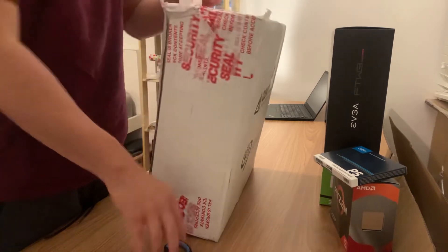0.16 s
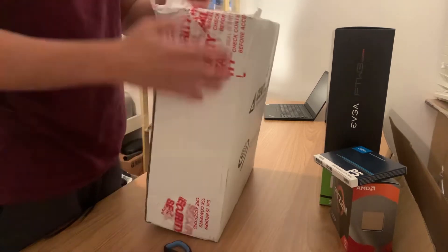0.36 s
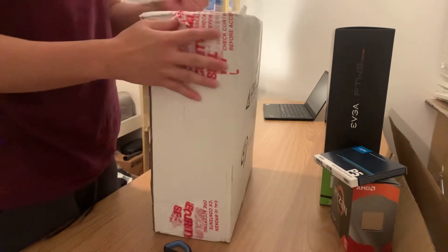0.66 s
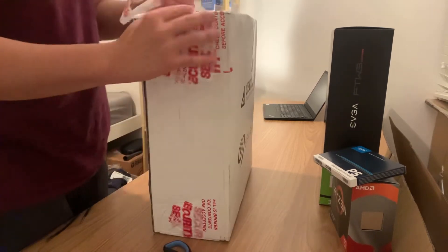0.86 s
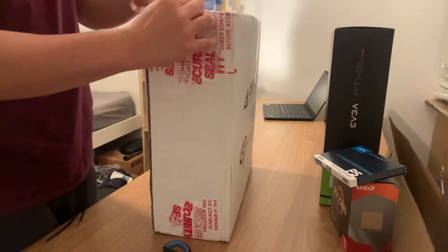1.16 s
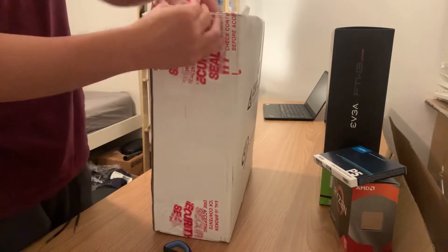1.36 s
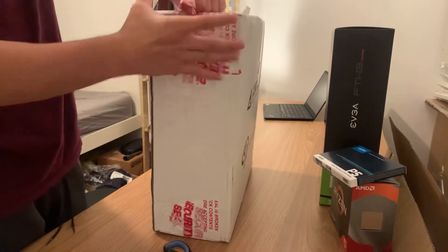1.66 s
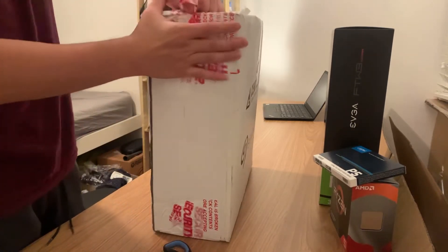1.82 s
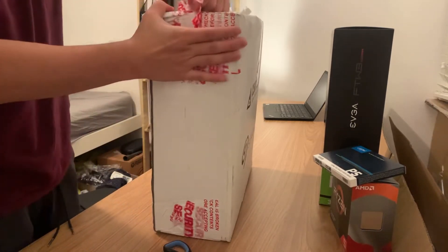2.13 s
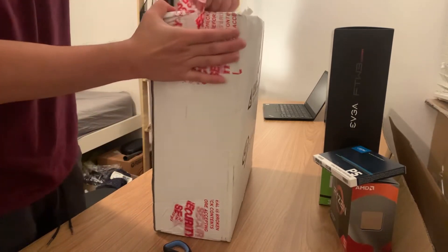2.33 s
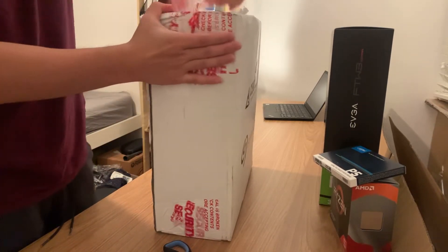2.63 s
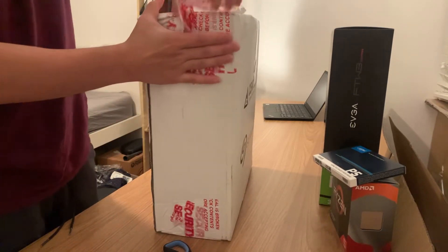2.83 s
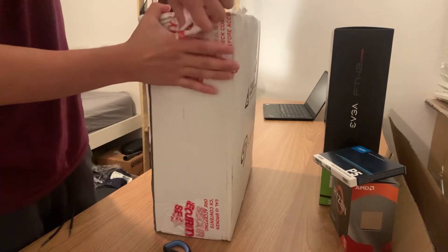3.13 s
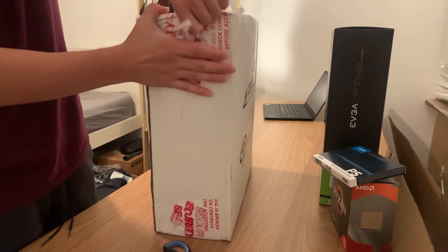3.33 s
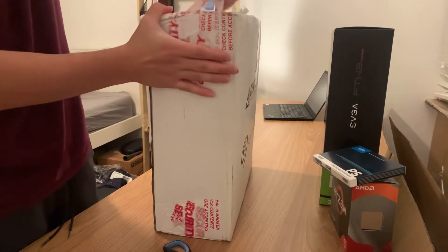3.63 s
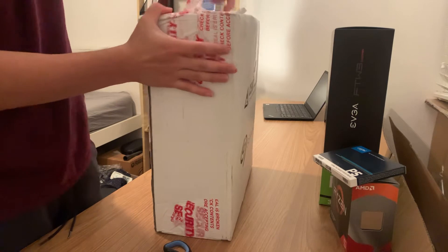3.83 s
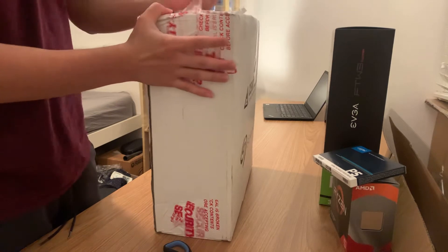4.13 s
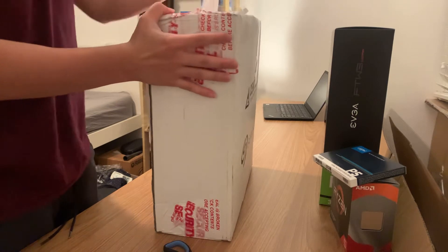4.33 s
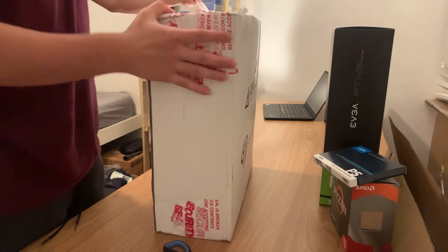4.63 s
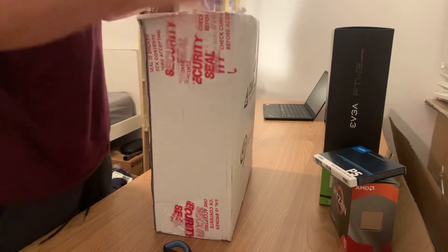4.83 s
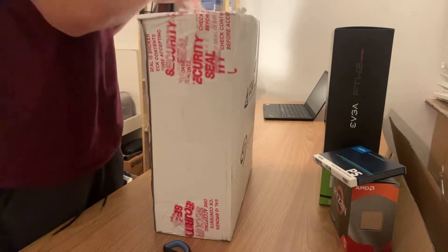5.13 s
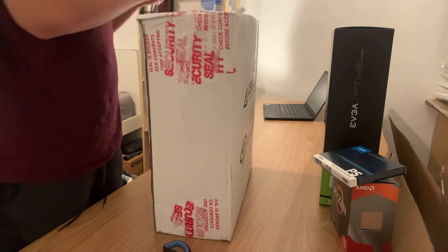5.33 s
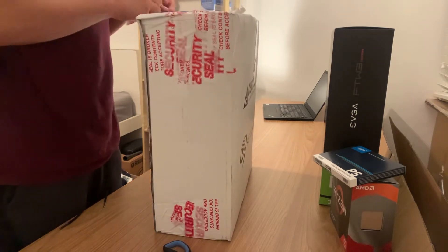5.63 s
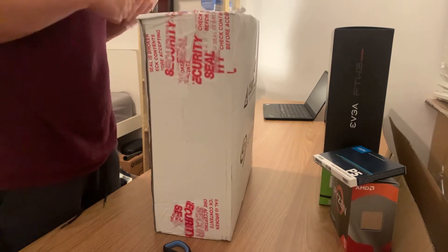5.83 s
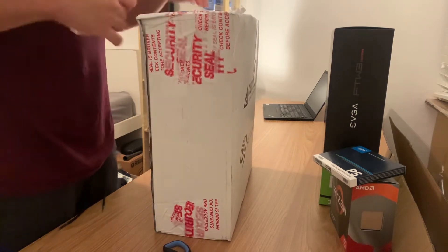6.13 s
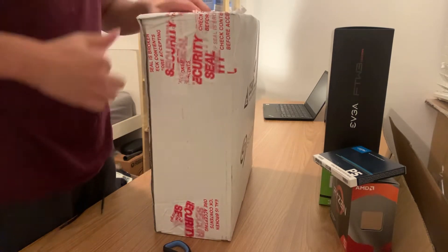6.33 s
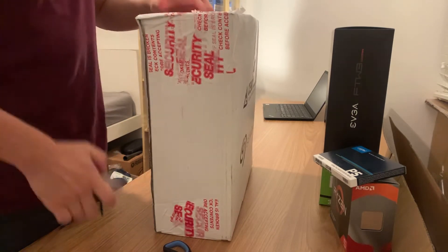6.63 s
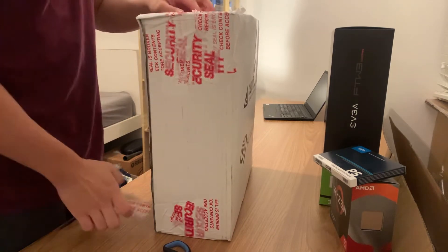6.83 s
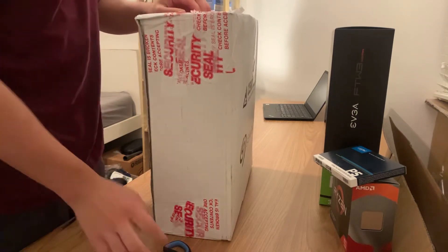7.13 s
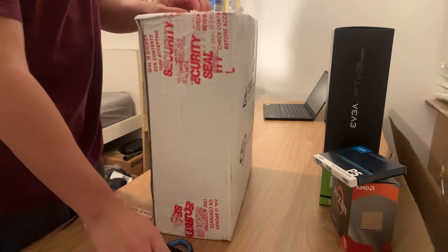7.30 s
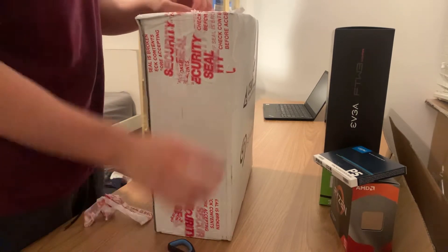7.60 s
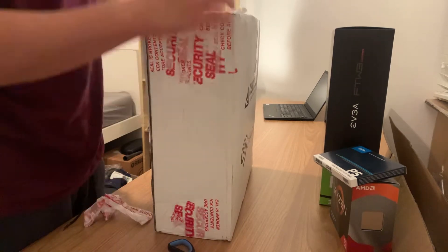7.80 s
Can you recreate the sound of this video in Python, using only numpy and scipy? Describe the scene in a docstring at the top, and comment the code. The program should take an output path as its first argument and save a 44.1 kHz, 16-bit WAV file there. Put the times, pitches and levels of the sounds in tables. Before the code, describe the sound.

Scissors clack onto a desk, tape film crinkles, then sharp snaps and one loud ripping peel off a cardboard box, followed by soft crackly handling.

```python
"""Packing tape ripped off a box

Packing tape is picked loose and ripped off a tall cardboard box on a desk in a small, live room.
Shaped random grains make the film crinkle, crack in a run of sharp tugs and peel in one stick-slip rip;
panel resonances make the box drum, and decaying sines make its walls bump.
Scissors clack on the desk at the start and near the end; hands rub the box or desk before and after
the rip, and afterwards the loose strip is crumpled."""
import sys
import numpy as np
from scipy import signal
from scipy.fft import rfft, irfft
from scipy.io import wavfile

SR = 44100
rng = np.random.default_rng(int(sys.argv[2]) if len(sys.argv) > 2 else 0)


def int16_out(signal):
    """Quantize to a 16-bit WAV file."""
    q = np.round(np.clip(np.atleast_2d(signal).T, -1, 1) * 32767)
    wavfile.write(sys.argv[1], SR, q.astype(np.int16))


N = 351036


def from_db(db):
    """Decibels to gain."""
    return 10 ** (np.asarray(db) / 20)


def rms_one(x):
    """Scale to unit rms."""
    return x / np.sqrt(np.mean(x ** 2) + 1e-20)


def unit_energy(x):
    """Scale a response so that white noise keeps its level."""
    return x / np.sqrt(np.sum(x ** 2) + 1e-20)


def in_time(rows):
    """Each column of a curve table at every sample."""
    s, *columns = np.transpose(rows)
    return [np.interp(np.arange(N) / SR, s, column) for column in columns]


def at_hz(points, hz):
    """Read a table on a log-frequency axis."""
    freqs, values = np.transpose(points)
    return np.interp(np.log(hz + 1e-9), np.log(freqs), values)


def through(x, response):
    """Convolve with an impulse response."""
    return signal.oaconvolve(x, response)[:N]


def colour(spectrum, size=4096):
    """Causal (minimum-phase) response with the shape of the spectrum and unit energy."""
    level_db = at_hz(spectrum, np.fft.rfftfreq(size, 1 / SR))
    cepstrum = irfft(np.log(from_db(level_db)))
    # fold the cepstrum forward in time
    cepstrum[1:size // 2] *= 2
    cepstrum[size // 2 + 1:] = 0
    return unit_energy(irfft(np.exp(rfft(cepstrum))))


def resonate(x, hz, width_hz):
    """Two-pole resonance with a gain of about 1 at its peak."""
    r = np.exp(-np.pi * width_hz / SR)
    zeros = np.array([1, 0, -1]) * (1 - r * r) / 2
    poles = [1, -2 * r * np.cos(2 * np.pi * hz / SR), r * r]
    return signal.lfilter(zeros, poles, x)


def drift(rate):
    """Random wander through `rate` new values per second, with spread about 1."""
    knots = np.arange(N) * rate / SR
    return np.interp(knots, np.arange(N // 8), rng.standard_normal(N // 8))


def grains(per_s, spread_db):
    """Random clicks of uneven size and either sign; rms 1."""
    sizes = from_db(spread_db * np.minimum(rng.exponential(1, N), 4))
    signs = rng.choice([-1, 1], N)
    struck = rng.random(N) < per_s / SR
    return rms_one(sizes * signs * struck)


def bursts(times, levels_db, t60s, hold, rise=0.034, size=12000):
    """Envelope of short avalanches: each builds up by 60 dB over its rise, holds for a moment, then dies away."""
    power, t = np.zeros(N + size), np.arange(size) / SR - rise
    for s, db, t60 in zip(times, levels_db, t60s):
        start = max(round((s - rise) * SR), 0)
        build_up = np.maximum(-t, 0) / rise
        die_away = np.maximum(t - hold, 0) / max(t60, 0.004)
        power[start:start + size] += from_db(db - 60 * (build_up + die_away)) ** 2
    return np.sqrt(power[:N])


def strokes(starts, lengths, levels_db, attack, release_t60):
    """Power of a series of hand moves: each swells, holds until its length is up, then dies away."""
    power, t = np.zeros(N + SR), np.arange(SR) / SR
    for s, length, db in zip(starts, lengths, levels_db):
        start = max(round(s * SR), 0)
        swell = np.minimum(t / max(attack, 0.001), 1)
        fall_db = 60 * np.maximum(t - length, 0) / release_t60
        power[start:start + SR] += (swell * from_db(db - fall_db)) ** 2
    return power[:N]


def together(*parts):
    """Joint amplitude of unrelated causes, each given as (power, dB)."""
    return np.sqrt(sum(power * from_db(db) ** 2 for power, db in parts))


# panel and air resonances of the box: f/Hz, width/Hz, level/dB (before the ring trim)
BOX_MODES = [(139, 18, -1.5), (216, 12, 2), (276.2, 14, 4), (347, 22, -6), (387.3, 25, 4.5), (453, 6.1, -2),
             (499, 50, -2.5), (560, 36, 3), (639, 50, 4), (706, 3.7, -1.5), (788, 12, -2.5), (783, 16, -6),
             (836, 6.6, 5.5), (877, 4.7, -5.5), (960, 16, -11), (1087, 46, 3.5), (1235, 60, -4.5),
             (1442, 13, 6), (1523, 6.7, 7), (1655, 37, 6.5)]


def box(spectrum, ring_db, size=12000):
    """Response of the cardboard: a dead knock plus its ringing modes."""
    knock = np.pad(colour(spectrum), (0, size))
    modes = sum(from_db(db) * resonate(knock, hz, width) for hz, width, db in BOX_MODES)
    return unit_energy(knock + from_db(ring_db) * modes)


# spectral shape of the still room: f/Hz, relative level/dB per Hz
AIR_COLOUR = [(30, -3), (70, -4), (500, -21), (1500, -20.5), (6000, -18.5), (16000, -35)]


def room_air():
    """The still room is steady, coloured noise."""
    return from_db(-74.5) * through(rng.standard_normal(N), colour(AIR_COLOUR))


# spectral shapes, each f/Hz, relative level/dB per Hz:
# film cracking, its fine treble, the box panel, and the box moved by hand
CRACK_COLOUR = [(700, -35), (1300, -3.5), (2000, 1.5), (3000, 1.5), (4200, 3), (6500, 0.5), (9000, -10),
                (16000, -36.5)]
SHEEN_COLOUR = [(3000, -44), (5500, -6), (7500, 4), (9500, 1.5), (12000, 2), (16000, -7)]
PANEL_COLOUR = [(200, -35), (450, -4), (800, 4), (1250, -0.5), (1800, -4), (2600, -10.5), (6000, -49)]
SHIFTING_COLOUR = [(25, -25.5), (45, -20.5), (68, -2), (100, -7), (150, -3), (220, -1), (380, -2.5),
                   (600, -11), (1500, -54)]
# faint stirring between the moves, all levels before mixing:
# t/s, level/dB of the held film, level/dB of the hand on the box
HOLDING_CURVE = [(0,-49.5,-46), (1,-58,-73), (2.3,-47,-59), (2.95,-50.5,-62), (4.65,-47.5,-63),
                 (4.9,-56.5,-89.5), (5.7,-49,-82), (6.5,-56.5,-67.5), (6.8,-73,-72), (7.68,-59,-60),
                 (7.85,-90,-75.5)]
# fingers bend or crumple the film, all levels before mixing:
# start t/s, length t/s, level/dB of coarse creases, level/dB of fine creases
FILM_FLEXES = [(0.392,0.1,-37.5,-36), (0.73,0.065,-49.5,-49.5), (0.826,0.027,-46.5,-45.5),
               (0.93,0.027,-58,-53.5), (1.048,0.043,-48,-47), (1.095,0.05,-47,-44.5),
               (1.327,0.21,-48.5,-52), (1.538,0.021,-41.5,-42.5), (1.625,0.094,-45.5,-52.5),
               (1.784,0.037,-64,-54), (1.894,.2,-42,-62), (2.26,0.067,-47.5,-63), (2.504,.11,-33,-37),
               (2.808,0.083,-41,-62), (3.052,0.037,-40.5,-43), (3.121,0.12,-43,-47.5),
               (3.343,0.056,-33.5,-36), (3.538,0.095,-32.5,-35.5), (3.68,0.034,-52,-38.5),
               (3.824,0.048,-57,-45.5), (3.919,.11,-49,-47.5), (4.704,0.091,-45,-53), (4.829,0.039,-43,-46),
               (4.919,.03,-49,-53), (5.012,0.033,-43,-52), (5.178,0.036,-43,-45), (5.204,0.022,-41.5,-46),
               (5.28,0.053,-43.5,-46.5), (5.454,0.11,-47.5,-51.5), (5.599,0.027,-43,-45),
               (5.817,0.056,-44.5,-47), (5.968,0.069,-41.5,-45.5), (6.131,0.045,-42,-44.5),
               (6.397,0.036,-48.5,-54), (6.556,0.063,-47.5,-51.5), (7.055,0.21,-63.5,-62.5),
               (7.255,.04,-47,-43)]
# a hand slides on the box or the desk, all levels before mixing:
# start t/s, length t/s, level/dB of rubbing, level/dB of rumble
HAND_RUBS = [(0.018,0.059,-47,-57), (0.077,0.085,-39.5,-37.5), (0.212,0.15,-53.5,-61),
             (0.372,0.071,-38.5,-69), (0.53,.08,-41.5,-52), (0.873,0.094,-59,-52.5), (1.107,0.088,-44,-43),
             (1.283,0.18,-58,-51), (1.436,0.071,-40.5,-53), (1.736,0.076,-49.5,-46), (1.928,0.18,-41,-45),
             (2.209,0.14,-40.5,-42.5), (2.382,.05,-41,-38), (2.57,0.039,-40,-57), (2.824,0.04,-43,-50),
             (3.134,0.058,-47.5,-47.5), (3.547,.09,-50,-42), (5.191,0.14,-57,-62), (5.599,0.023,-55,-72),
             (5.831,0.05,-56,-80), (6.151,0.055,-48.5,-48), (6.387,0.25,-64,-78), (6.727,.1,-64,-56),
             (6.842,.09,-50,-51.5), (7.033,0.048,-59,-58.5), (7.151,0.051,-51,-48.5),
             (7.205,0.11,-39.5,-37.5), (7.399,0.074,-50.5,-47), (7.55,0.05,-59,-60), (7.698,0.05,-53.5,-77)]


def handling():
    """Film crackles in clumps of tiny creases while fingers rub and shift the box."""
    film_db, hand_db = in_time(HOLDING_CURVE)
    held, resting = from_db(film_db) ** 2, from_db(hand_db) ** 2
    s, length, *levels = np.transpose(FILM_FLEXES)
    coarse, fine = [strokes(s, length, db, attack=0.004, release_t60=0.067) for db in levels]
    s, length, *levels = np.transpose(HAND_RUBS)
    rubbing, shifting = [strokes(s, length, db, attack=0.017, release_t60=0.12) for db in levels]
    flexing = coarse + held

    # a flex reaches the card while the tape is on it; later only the loose strip gives it body
    freed_s = 4.7
    stuck = np.arange(N) / SR < freed_s
    flex_rub_db = np.where(stuck, -14, -21)
    flex_rumble_db = np.where(stuck, -16, -42.5)

    clumps = from_db(3.5 * drift(110))
    creases = rms_one(grains(per_s=2500, spread_db=4.5) * clumps)
    fine_creases = rms_one(grains(per_s=6200, spread_db=13.0) * clumps)
    friction = rms_one(grains(per_s=3000, spread_db=2.0) * from_db(1.5 * drift(70)))

    # rubbing also lends dry treble to the rustle and the sheen
    rustle = creases * together((flexing, -2), (rubbing, -6))
    sheen = fine_creases * together((fine, 0), (held, -3), (rubbing, -16.5))
    rub = friction * together((rubbing, -1.5), (resting, -3), (flexing, flex_rub_db))
    rumble = friction * together((shifting + resting, -1), (flexing, flex_rumble_db))

    film = through(rustle, colour(CRACK_COLOUR)) + through(sheen, colour(SHEEN_COLOUR))
    panel = through(rub, box(PANEL_COLOUR, ring_db=-6))
    body = through(rumble, box(SHIFTING_COLOUR, ring_db=-1.5))
    return film + panel + body


# spectral shapes of blades and handles, and of the desk top: f/Hz, relative level/dB per Hz
CLACK_COLOUR = [(700,-27), (1500,-1), (2500,8.5), (3200,-0.5), (4400,7.5), (6000,-3), (9000,-11),
                (16000,-22)]
DESK_COLOUR = [(60,-22), (130,9), (250,0), (450,-2.5), (750,7.5), (1200,-7), (2500,-22), (6000,-59)]
# the scissors are laid on the desk and later picked up:
# t/s, level/dB of the clack, level/dB of the knock in the desk (before mixing)
SCISSOR_HITS = [(0.0172,-33.5,-57), (0.0648,-31,-24), (0.0916,-26,-25.5), (7.206,-45,-39),
                (7.2948,-27.5,-33.5), (7.31,-30.5,-38)]


def scissors(hold, rise):
    """The loose blades rattle for a moment and knock on the desk top."""
    s, clack_db, knock_db = np.transpose(SCISSOR_HITS)
    rattle = grains(per_s=5000, spread_db=0.0)
    t60s = np.full(len(s), 0.068)
    clack = through(rattle * bursts(s, clack_db, t60s, hold, rise), colour(CLACK_COLOUR))
    knock = through(rattle * bursts(s, knock_db, t60s, hold, rise), colour(DESK_COLOUR))
    return clack + knock


# spectral shape of the shudder: f/Hz, relative level/dB per Hz
RUMBLE_COLOUR = [(25, -31.5), (45, -23), (68, 13), (100, -9), (145, 1), (220, 1.5), (380, -6), (600, -7.5),
                 (1500, -72.5)]
# a hand or a tug pushes the box wall: t/s, level/dB (before trims), centre f/Hz
WALL_BUMPS = [(0.086,-28.5,145), (0.348,-25.5,128), (0.379,-33.5,128), (0.522,-24.5,148), (0.545,-25.5,137),
              (1.138,-40,240), (1.762,-36.5,264), (2.402,-34,228), (3.335,-35.5,265), (3.434,-25,267),
              (3.495,-24,212), (3.513,-30.5,211), (4.602,-30,338), (4.613,-37,253), (6.179,-41.5,146.7),
              (7.216,-37,145.6), (7.424,-34,198), (7.909,-54,136)]


def bumps(t60, boom_db, size=16000):
    """A soft push swings the box wall for a few cycles and wakes its low modes."""
    push, t = np.zeros(N + size), np.arange(size) / SR
    for s, db, hz in WALL_BUMPS:
        start = round(s * SR)
        push[start:start + size] += from_db(db - 60 * t / t60) * np.sin(2 * np.pi * hz * t)
    s, db, hz = np.transpose(WALL_BUMPS)
    # slow, heavy pushes reach the desk; quick ones stay in the card
    heavy_db = boom_db - 18 * np.log2(np.maximum(hz / 150, 1))
    shudder = rng.standard_normal(N) * bursts(s, db + heavy_db, np.full(len(s), t60), hold=0.0066)
    return from_db(4) * push[:N] + through(shudder, box(RUMBLE_COLOUR, ring_db=-9.0))


# a facet of sticky film chirps as it lets go:
# t/s, level/dB (before trim), ring f/Hz, nominal length t/s
FILM_SQUEAKS = [(0.391,-19.5,1580,0.013), (0.417,-32,1560,0.013), (0.8,-46,2450,0.02),
                (0.837,-45,2400,0.018), (0.92,-42.5,2180,0.015), (1.167,-32.5,1280,0.017),
                (1.421,-27.5,4180,0.018), (2.056,-27,3600,0.05), (2.158,-32.5,3400,0.037),
                (2.502,-44,4200,0.023), (3.332,-12,1690,0.01), (3.49,-11,1730,0.009), (3.814,-29,1130,.02),
                (3.817,-34,3700,0.016), (3.999,-32.5,1620,0.016), (4.047,-19,2290,.011),
                (4.851,-41,2300,0.034), (5.097,-36,2400,0.014), (5.591,-36,1970,.027),
                (5.794,-36.5,1640,0.051), (5.851,-24,1240,0.015), (6.013,-37.5,2430,0.04),
                (6.138,-36,2130,.021), (6.402,-45.5,2150,.034)]


def squeaks(level_db, relative_width, overtone_db, size=6000):
    """A brief run of slips sets one small facet of film ringing."""
    out, t = np.zeros(N + size), np.arange(size) / SR
    slips = np.pad(grains(per_s=2500, spread_db=-0.5), (0, size))
    for s, db, hz, length in FILM_SQUEAKS:
        start = round(s * SR)
        age = 3 * t / max(length, 0.005)  # the push peaks at a third of the length
        push = slips[start:start + size] * age * np.exp(1 - age)
        width_hz = relative_width * hz
        ring = resonate(push, hz, width_hz)
        overtone = resonate(push, 2 * hz, 2 * width_hz)
        out[start:start + size] += from_db(db + level_db) * (ring + from_db(overtone_db) * overtone)
    return out[:N]


# spectral shape of the low box boom: f/Hz, relative level/dB per Hz
BOOM_COLOUR = [(60, -22.5), (130, -8.5), (200, 1), (400, 1.5), (600, -30), (1500, -52)]


def snaps(table, hold, rise, jolt, ring_db, crack_db, boom_db, panel_db, sheen_db):
    """Each snap is an avalanche of tiny fractures in the film; the sudden release also jolts the card under it."""
    s, crack, boom, panel, sheen, t60 = np.transpose(table)
    fractures = grains(per_s=9000, spread_db=6.5)
    release = fractures.copy()
    release[np.round(s * SR).astype(int)] += jolt
    paths = [(fractures, crack + crack_db, colour(CRACK_COLOUR)),
             (fractures, sheen + sheen_db, colour(SHEEN_COLOUR)),
             (release, boom + boom_db, box(BOOM_COLOUR, ring_db)),
             (release, panel + panel_db, box(PANEL_COLOUR, ring_db))]
    return sum(through(force * bursts(s, db, t60, hold, rise), response) for force, db, response in paths)


# the film buckles or a bit of it lifts, all levels before trims:
# t/s, level/dB of the crack, level/dB of the knock in the card, level/dB of the sheen
FILM_CRINKLES = [(0.3958,-18.5,-34.5,-29), (0.419,-30,-38,-39), (0.5204,-14,-22,-19), (0.568,-24,-49,-29),
                 (0.6047,-23,-34.5,-28.5), (1.4258,-24.5,-35,-36), (1.8686,-23,-39.5,-35.5),
                 (1.9043,-19.5,-32.5,-30.5), (1.9176,-20,-34,-40), (1.97,-16,-37.5,-24.5),
                 (2.0369,-19.5,-30,-27.5), (2.0684,-14,-22.5,-23), (2.1437,-15.5,-30,-31.5),
                 (2.2338,-17.5,-23,-28.5), (2.5195,-19,-43,-33), (2.5414,-24,-47,-35),
                 (2.587,-41,-34.5,-41), (2.9986,-37,-72,-41.5), (3.6792,-23.5,-43,-31.5),
                 (3.818,-31,-41.5,-37), (3.9977,-27.5,-52,-32), (5.01,-29.5,-60.5,-43.5),
                 (5.0997,-33,-58.5,-55), (5.857,-25,-59,-30.5), (6.8722,-41,-51,-45.5), (6.951,-37,-61,-47),
                 (7.5328,-44,-62,-51), (7.6663,-43,-50.5,-44.5), (7.7209,-39.5,-47.5,-56)]


def crinkles():
    """Small buckles snap the film and knock the card, whose boom and panel share one table level."""
    t60 = 0.033  # s
    buckles = [(s, crack, card, card, sheen, t60) for s, crack, card, sheen in FILM_CRINKLES]
    return snaps(buckles, hold=0.0019, rise=0.0089, jolt=6, ring_db=0.5,
                 crack_db=-7.0, boom_db=-1.5, panel_db=1.7, sheen_db=2.0)


# tape gives way under a tug, all levels before trims:
# t/s, then level/dB of crack, boom, panel and sheen, burst t60 t/s
TAPE_TUGS = [(3.3354, -12.5, -21.5, -19.5, -22, 0.018), (3.4319, -6.5, -18, -12, -11, 0.01),
             (3.4933, -11, -17.5, -15, -14.5, 0.054), (3.5117, -18, -38, -29.5, -19, 0.034),
             (3.5268, -11.5, -43, -28.5, -23, 0.023), (3.5965, -25, -46, -25.5, -25, 0.082),
             (4.0468, -14, -26, -21, -22, 0.011)]


def tugs():
    """Stuck tape gives way in sharp snaps that jolt the box."""
    return snaps(TAPE_TUGS, hold=0.0025, rise=0.012, jolt=6.2, ring_db=0.5,
                 crack_db=-5.0, boom_db=3.5, panel_db=1.5, sheen_db=-0.5)


# the taut strip while it is pulled: t/s, ring f/Hz, level/dB (before mixing)
STRIP_CURVE = [(4.08,850,-28), (4.13,630,-26.5), (4.19,1400,-26.5), (4.265,999,-18), (4.31,1030,-24.5),
               (4.34,752,-27.5), (4.39,780,-66), (4.6,380,-36), (4.69,285,-52)]
# spectral shape of the adhesive fizz: f/Hz, relative level/dB per Hz
FIZZ_COLOUR = [(1180, -33), (2000, -1), (2380, 2), (2640, -2.5), (3520, 1), (4990, 0), (6470, -1),
               (11500, -3), (15100, -5.5), (16000, -25.5)]
# strength of the pull, before mixing: t/s, level/dB of adhesive fizz, level/dB of panel rasp
RIP_CURVE = [(4.08,-14,-17.5), (4.13,-18.5,-16.5), (4.2,-15.5,-21.5), (4.3,-16.5,-35.5), (4.365,-24,-32.5),
             (4.49,-23,-25), (4.54,-32,-40), (4.6,-55,-62), (4.68,-56,-60)]


def rip(start, end, slips_per_s, jitter, slip_depth):
    """The peel front sticks and slips; each slip breaks a shower of glue threads and plucks panel and strip."""
    fizz_db, panel_db = in_time(RIP_CURVE)
    strip_hz, strip_db = in_time(STRIP_CURVE)
    boom_db = -15.5 + 0.89 * fizz_db  # the boom follows most of the pull's swing
    t = np.arange(N) / SR
    pulling = np.clip((t - start) / 0.016, 0, 1) * np.clip((end - t) / 0.038, 0, 1)

    phase = np.cumsum(slips_per_s * np.exp(jitter * drift(300))) / SR
    slip = rms_one(np.exp(-slip_depth * (phase % 1)))
    threads = rms_one(grains(per_s=7500, spread_db=2.0) * np.sqrt(slip))
    plucks = rms_one(grains(per_s=5000, spread_db=2.0) * slip)

    fizz = through(threads * pulling * from_db(fizz_db), colour(FIZZ_COLOUR))
    rasp = through(plucks * pulling * from_db(panel_db), box(PANEL_COLOUR, ring_db=5))
    boom = through(plucks * pulling * from_db(boom_db), box(SHIFTING_COLOUR, ring_db=1.0))
    strip = strip_ring(plucks, strip_hz, width_hz=54) * pulling * from_db(strip_db)
    return fizz + rasp + boom + strip


def strip_ring(x, centre_hz, width_hz, size=128):
    """The free strip rings at a gliding pitch set by its length and tension; rms 1."""
    out, state, r = np.zeros(N), np.zeros(2), np.exp(-np.pi * width_hz / SR)
    for i in range(0, N, size):
        poles = [1, -2 * r * np.cos(2 * np.pi * centre_hz[i] / SR), r * r]
        out[i:i + size], state = signal.lfilter([1, 0, -1], poles, x[i:i + size], zi=state)
    return rms_one(out)


# decay of the diffuse room tail: f/Hz, t60 t/s
ROOM_DECAY = [(100, 0.38), (400, 0.31), (1500, 0.27), (5000, 0.29), (10000, 0.25), (16000, 0.24)]


def echoes(near_db, near_t60, size=26000):
    """One place in the room: a tight cluster from desk and wall, then a diffuse tail that dies band by band."""
    t = np.arange(size) / SR
    sparse = rng.standard_normal(size) * (rng.random(size) < 0.1)
    near = sparse * from_db(-60 * t / near_t60) * (t > 0.001)
    white, hz = rfft(rng.standard_normal(size)), np.fft.rfftfreq(size, 1 / SR)
    edges = np.append(0, np.geomspace(150, SR / 2, num=8))
    tail = np.zeros(size)
    for lo, hi in zip(edges, edges[1:]):
        band = irfft(white * (hz >= lo) * (hz < hi))
        tail += band * from_db(-60 * t / at_hz(ROOM_DECAY, (lo + hi) / 2))
    tail *= np.clip(t / 0.011 - 0.5, 0, 1)  # the tail fades in behind the cluster
    return unit_energy(from_db(near_db) * unit_energy(near) + unit_energy(tail))


def split(x, hz):
    """Lower and upper band of a sound."""
    return [signal.sosfilt(signal.butter(3, hz, kind, fs=SR, output="sos"), x) for kind in ("low", "high")]


def room(x, moves_per_s, count=8):
    """The sounding spot keeps moving, so one echo pattern fades into the next; the shorter the wave, the sooner."""
    bass, rest = split(x, 450)
    middle, treble = split(rest, 1800)
    feeds, n = np.zeros((count, N)), np.arange(N)
    for band, rate in zip((bass, middle, treble), moves_per_s):
        place, fade = np.divmod(n * rate / SR, 1)
        place = place.astype(int)
        feeds[place % count, n] += band * np.cos(fade * np.pi / 2)
        feeds[(place + 1) % count, n] += band * np.sin(fade * np.pi / 2)
    return sum(through(feed, echoes(near_db=0.98, near_t60=0.04)) for feed in feeds)


def scene():
    """Tape, box, hands and scissors share the one room, over its faint steady air."""
    air = room_air()
    # small noises come from beside and behind the box and reach the microphone mostly by the walls
    shaded = handling() + scissors(hold=0.0027, rise=0.01) + crinkles()
    shaded += squeaks(level_db=11.0, relative_width=0.17, overtone_db=-21.5)
    near = bumps(t60=0.066, boom_db=-6.5) + tugs()
    near += rip(start=4.074, end=4.7, slips_per_s=140, jitter=0.45, slip_depth=2.3)
    direct = from_db(-5) * near + from_db(-6) * shaded
    reflected = room(from_db(-3.0) * near + from_db(-1.0) * shaded, moves_per_s=(9, 80, 420))
    return (direct + reflected + air)[None]


def record(dry):
    """The microphone drops the deepest bass, the sharpest peaks are rounded, and the top is cut steeply."""
    peak_top, cutoff_hz = 0.61, 16000  # peaks are rounded towards peak_top
    x = signal.sosfilt(signal.butter(2, 55, "high", fs=SR, output="sos"), dry)
    x = peak_top * np.tanh(x / peak_top)
    return signal.sosfilt(signal.ellip(12, 0.1, 80, cutoff_hz, fs=SR, output="sos"), x)


dry = scene()
out = record(dry)
int16_out(out)
```